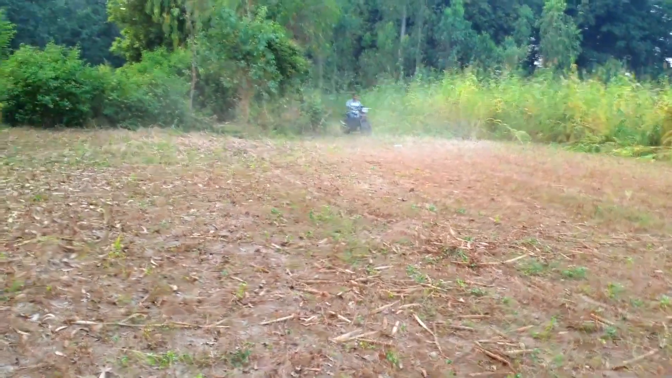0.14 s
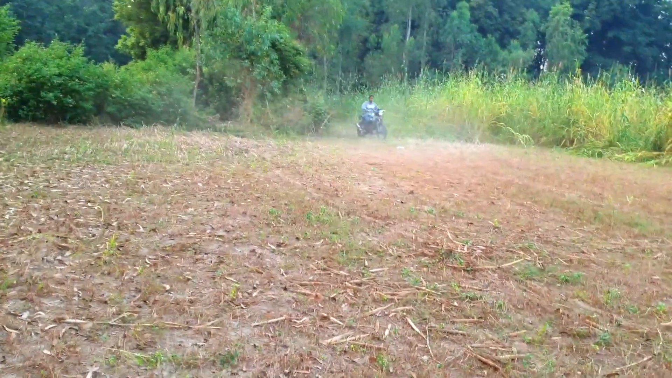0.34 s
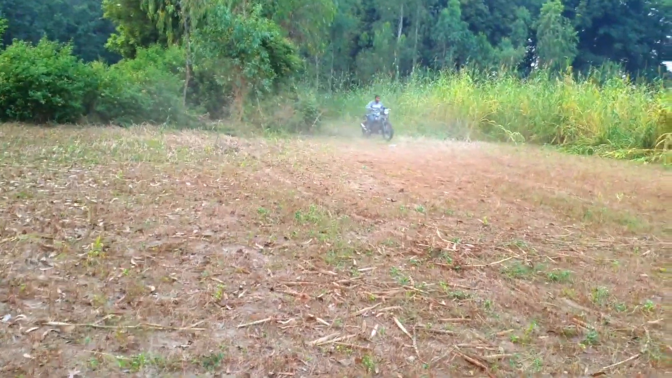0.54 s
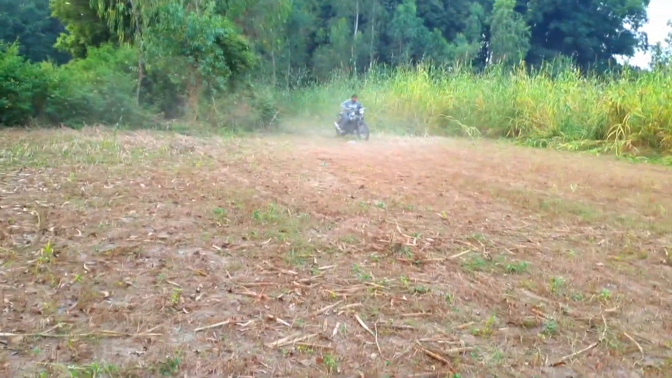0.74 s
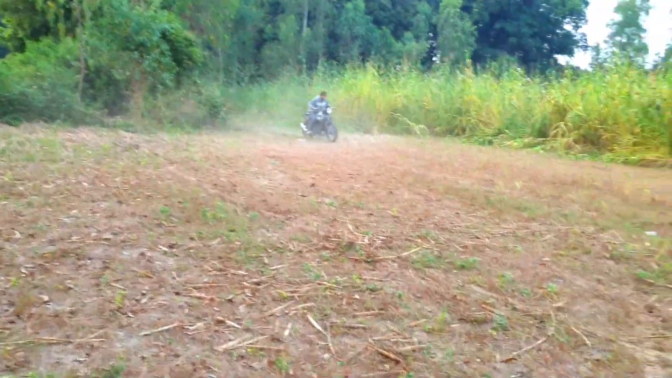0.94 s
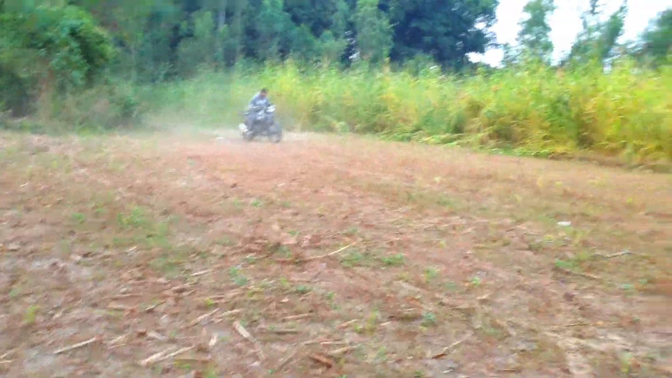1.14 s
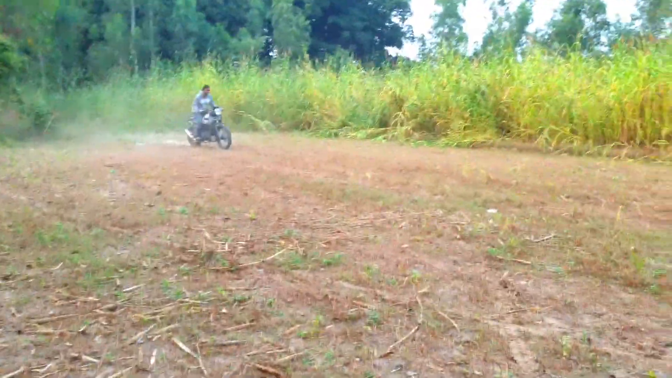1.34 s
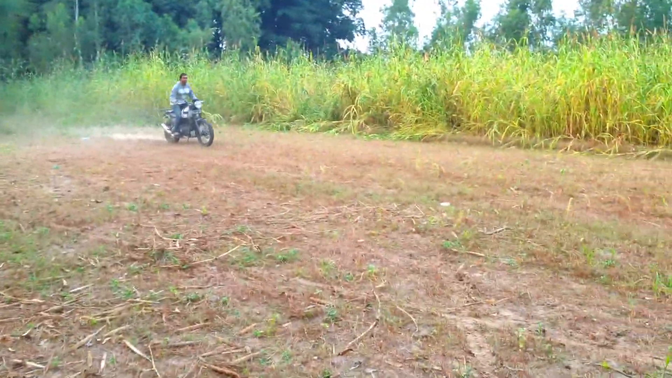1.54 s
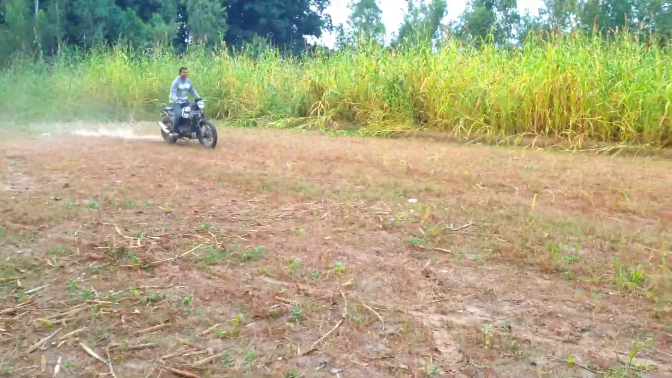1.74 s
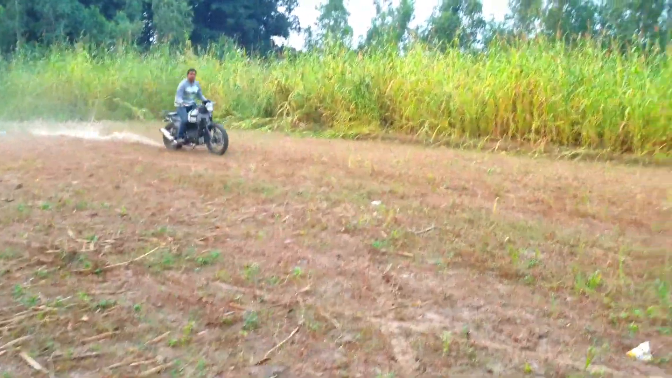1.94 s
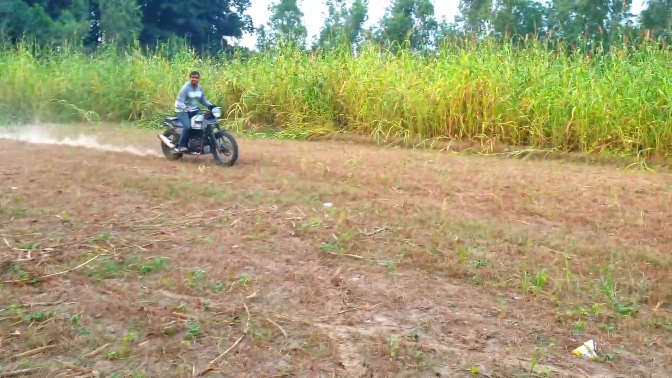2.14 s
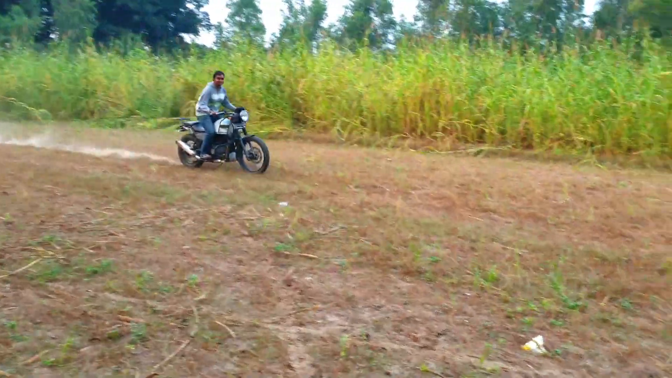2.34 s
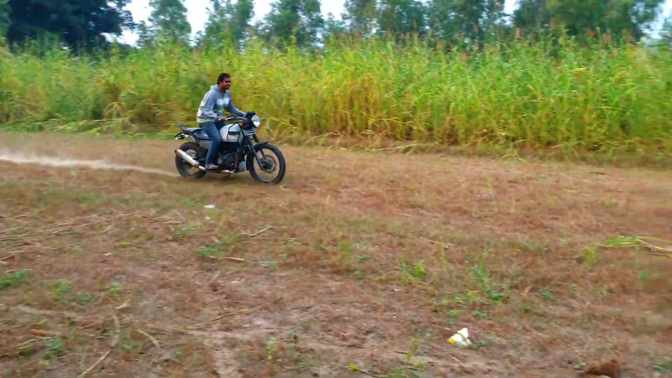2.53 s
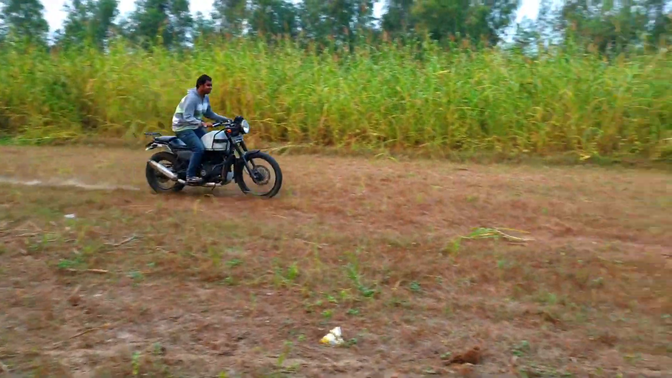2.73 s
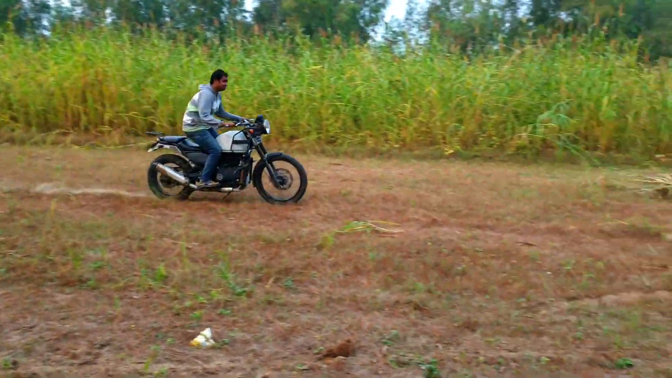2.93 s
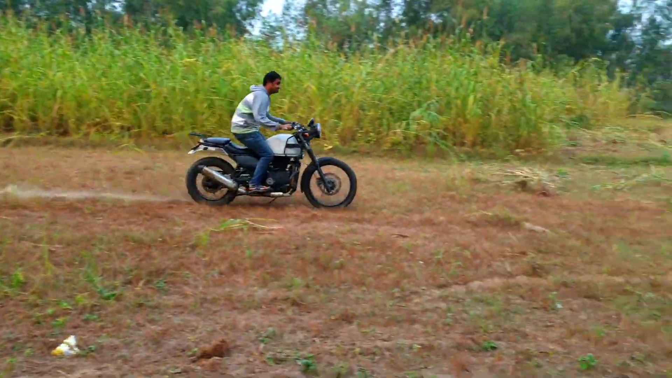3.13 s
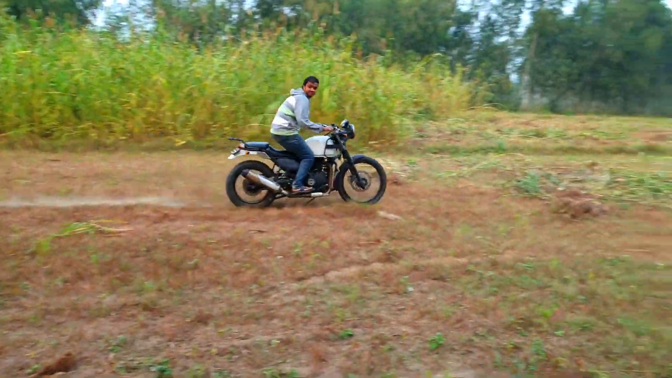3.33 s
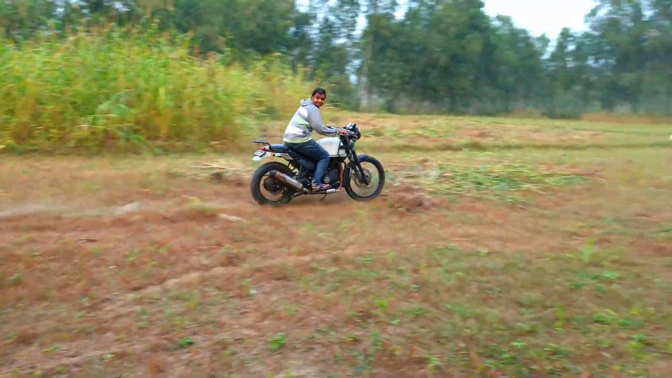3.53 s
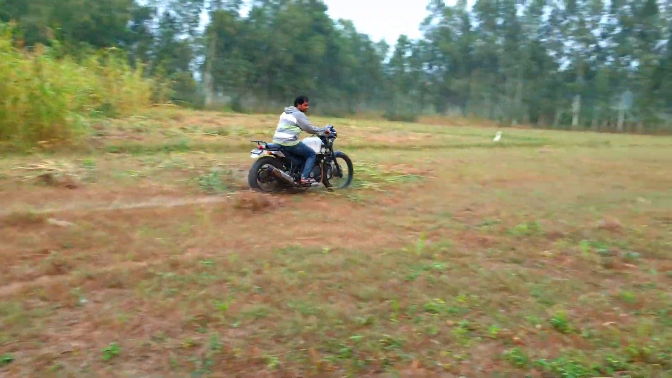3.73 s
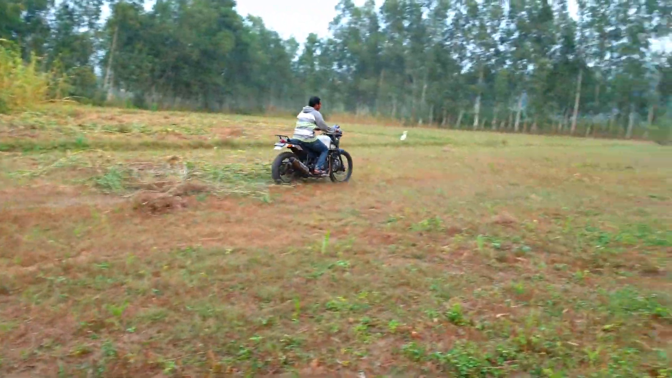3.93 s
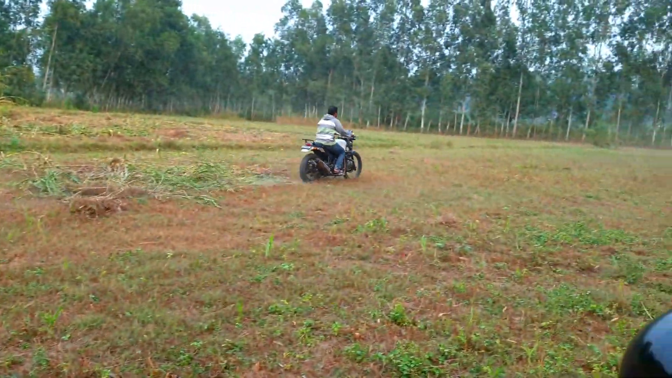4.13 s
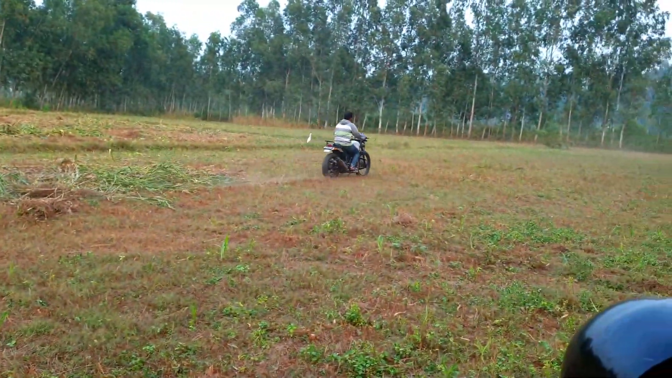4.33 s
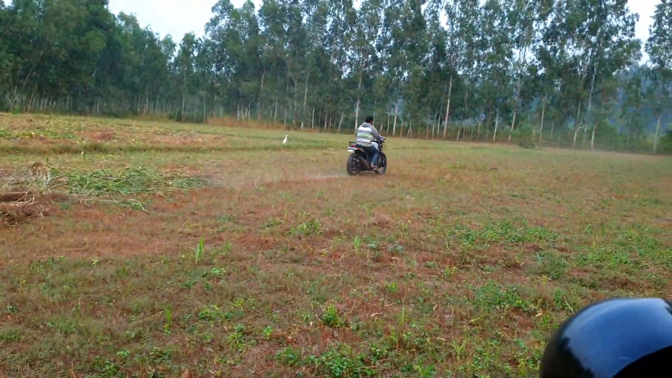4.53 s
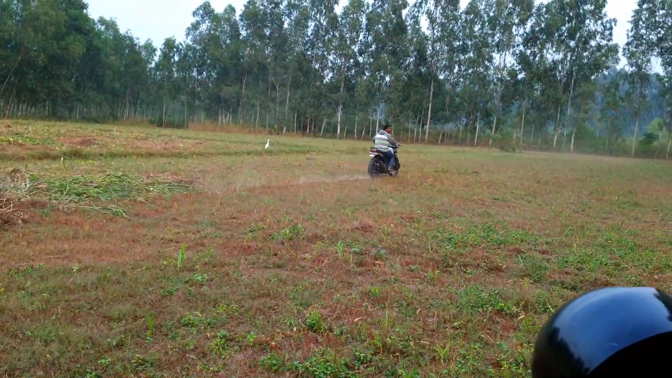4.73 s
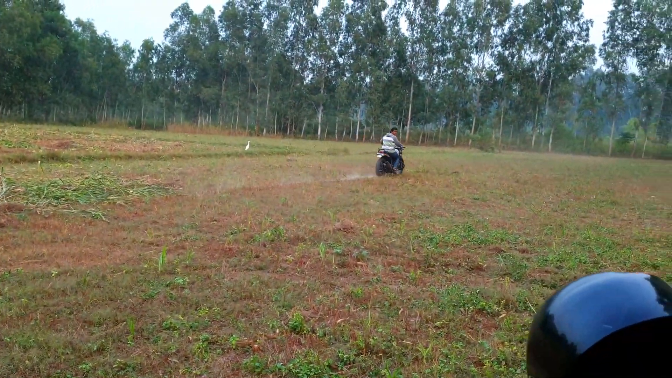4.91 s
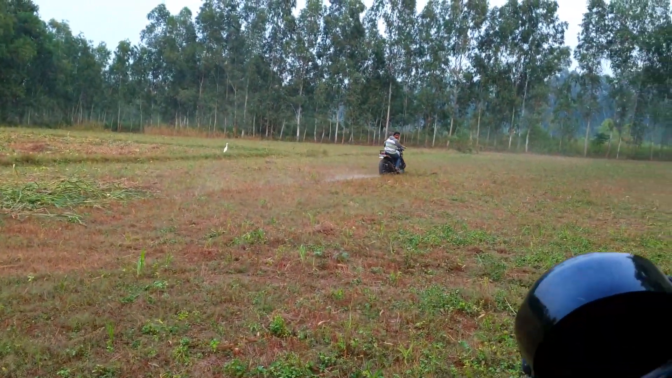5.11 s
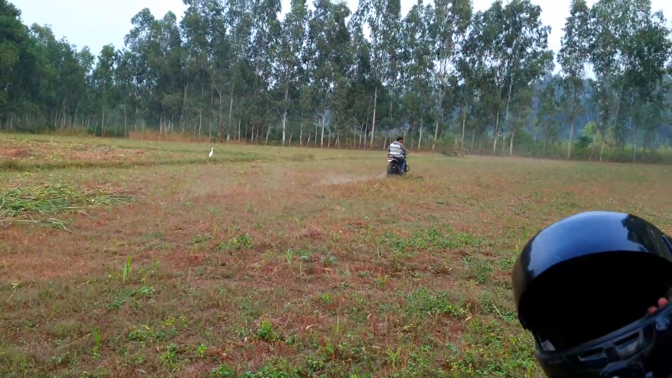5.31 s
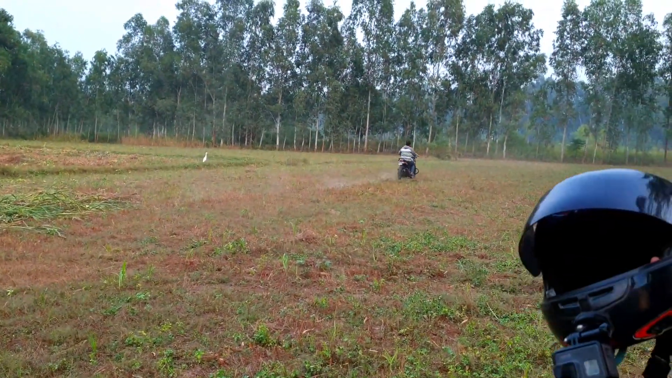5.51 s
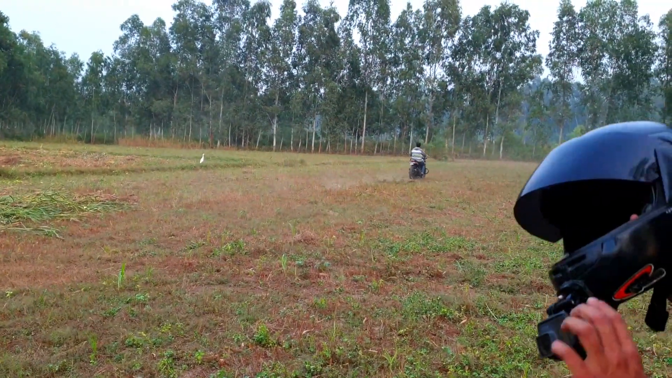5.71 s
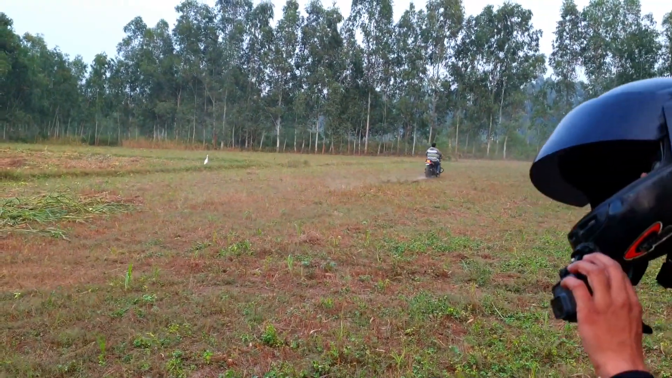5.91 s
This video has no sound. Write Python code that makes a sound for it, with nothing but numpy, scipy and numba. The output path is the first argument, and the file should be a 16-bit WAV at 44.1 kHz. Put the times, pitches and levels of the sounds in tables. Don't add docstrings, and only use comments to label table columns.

```python
import sys
import numpy as np
from scipy import signal
from scipy.fft import rfft, irfft, next_fast_len
from scipy.io import wavfile
from scipy.ndimage import uniform_filter1d, map_coordinates
from numba import njit

SR = 44100
rng = np.random.default_rng(int(sys.argv[2]) if len(sys.argv) > 2 else 0)


def store_pcm(level_fs):
    pcm = np.round(np.clip(level_fs, -1, 1) * 32767).astype(np.int16)
    wavfile.write(sys.argv[1], SR, np.atleast_2d(pcm).T)


def volts_from_db(level):
    exponent = np.asarray(level, float) / 20
    return 10 ** exponent


N = 267141
TIME_S = np.arange(N) / SR
GRID_HZ = np.arange(2049) * SR / 4096
SHUT_S = 3.76
SWITCH_S, SWITCH_FADE_S = 3.145, 0.0036


# (time [s], firing rate [Hz])
RIDE = [(0, 22.7), (.45, 23.2), (.8, 28.2), (1.05, 29.7), (1.33, 39.5), (1.68, 45.2), (2.09, 46.4),
        (2.25, 49.7), (2.48, 52.7), (2.65, 52.8), (3.05, 55.9), (3.3, 57.4), (3.63, 56.4), (3.9, 47.2),
        (4.17, 45), (4.75, 41.9), (5.42, 38.2), (6.06, 33.5)]


def firings():
    hz = curve(RIDE)[0]
    turns = np.cumsum(hz) / SR + 0.005 * walk(15)
    turns += 2 - turns[int((POPS[-1][0] - 0.002) * SR)] % 1
    cycle = np.maximum.accumulate(turns.astype(int))
    clicks = np.diff(cycle, prepend=cycle[0]).astype(float)
    chance = rng.standard_normal((N // 500, 4))[cycle].T
    return hz, turns, clicks, chance


# (frequency [Hz], width [Hz], level [dB])
BOOM = [(55, 15, 1), (118, 177, 3.5)]


def silencer(pulses, turns):
    cooling_hz_per_s = 8.6
    chamber_hz = 131.8 - cooling_hz_per_s * np.maximum(TIME_S - SHUT_S, 0)
    boom = ring(chamber(pulses, chamber_hz, 31.0), BOOM)
    boom = signal.sosfilt(signal.butter(2, 360, fs=SR, output="sos"), boom)
    spin = np.exp(4j * np.pi * turns)
    slow = signal.sosfiltfilt(signal.butter(2, 7, fs=SR, output="sos"), boom / spin)
    crank = 2 * (slow * spin).real
    return even(crank), even(boom - crank, 0.22)


@njit
def chamber(x, hz, width):
    y, band, low = np.empty(len(x)), 0., 0.
    for i in range(len(x)):
        g, k = np.tan(np.pi * hz[i] / SR), width / hz[i]
        v = (band + g * (x[i] - low)) / (1 + g * (g + k))
        band, low, y[i] = 2 * v - band, low + 2 * g * v, k * v
    return y


# (frequency [Hz], density [dB per Hz])
BARK = [
    [(94, -24.5), (160, 8), (204, 7), (226, 4), (254, 4), (319, 3.5), (352, -13.5), (415, -0.5), (507, -32),
     (545, -15.5), (798, -15), (881, -21), (983, -22), (1400, -19), (1820, -78), (3080, -120)],
    [(94, -40), (160, -2.5), (225, 2.5), (285, 2), (342, 1.5), (400, -12), (475, -21.5), (620, -16),
     (800, -20), (1400, -16.5), (1820, -69), (3080, -120)],
    [(94, -26.5), (160, 3), (220, 3.5), (300, 4), (350, -1), (400, -18), (460, -38), (700, -54),
     (1230, -120)],
]


def tailpipe(pulses):
    echo = np.interp(np.arange(N) - 0.00879 * SR, np.arange(N), pulses)
    flutter = 0.007 * volts_from_db(2 * walk(30)) * rng.standard_normal(N)
    return even(facing(pulses + 0.16 * echo + flutter, BARK, curve(ASPECT)[1]), 1.0)


def exhaust(turns, clicks, chance, surge, crank_db, boom_db, bark_db):
    stumble = np.exp(-((TIME_S - SHUT_S) / 0.045) ** 2)
    scatter_db = (0.8 + 3.5 * stumble) * chance
    boost_db = 4 * stumble
    pulses = clicks * volts_from_db(scatter_db)
    crank, boom = silencer(pulses, turns)
    bark = tailpipe(pulses)
    extra_db = sum(db * (abs(TIME_S - s) < 0.006) for s, db, *_ in POPS)
    charge = volts_from_db(fade(extra_db * clicks, 0.0092))
    boom_level = volts_from_db(boom_db + boost_db - 5.5 * surge)
    return volts_from_db(crank_db) * crank + charge * (boom_level * boom + volts_from_db(bark_db + boost_db) * bark)


def load_whine(turns, surge):
    return volts_from_db(-34) * surge * np.sin(12 * np.pi * turns)


def gas_gate(hz, turns, chance, strength):
    depth = np.clip(0.13 * 30 / hz, 0, 1)
    puff = volts_from_db(2.0 * chance) * np.exp(-(turns % 1) / hz / 0.0029)
    return 1 - depth + strength * depth * puff


# (frequency [Hz], density [dB per Hz])
RASP = [
    [(250, -69), (420, -9), (507, -10.5), (781, -8.5), (878, -17.5), (978, -22.5), (1430, -14), (1770, -13),
     (1950, -7), (2260, -9.5), (2700, -6), (3230, -7), (3600, -7.5), (4680, -10.5), (7920, -120)],
    [(250, -54), (420, -26), (526, -13.5), (613, -10), (817, -8.5), (1120, -10), (1400, -2), (1940, -7.5),
     (2160, 1), (2490, -4.5), (2800, -1.5), (3170, -7.5), (3600, -32.5), (4680, -17), (7920, -120)],
    [(250, -6), (420, -9.5), (575, -31), (689, -8), (995, -12), (1250, -8.5), (1560, -4.5), (1720, -8),
     (1870, 3.5), (2030, -4.5), (2280, 5.5), (3200, -8), (3600, -10.5), (4680, -66), (7920, -120)],
]


def gas_rasp(hz, turns, chance):
    return hiss(gas_gate(hz, turns, chance, 3) * volts_from_db(0.94 * walk(25.07)), RASP, 1.3)


# (frequency [Hz], density [dB per Hz])
SIZZLE = [
    [(2060, -16), (3500, -30.5), (4180, 1.5), (4620, -9), (5340, 1), (6220, 3.5), (6750, -2), (8150, -8),
     (9140, -3.5), (11400, -8), (12700, -12), (14200, -15), (15800, -22.5)],
    [(2060, -30), (3500, 0), (3780, -2), (4650, -6.5), (6620, -2), (7900, -7), (9920, -9), (11500, -11),
     (12900, -13.5), (15100, -16.5), (15800, -75.5)],
    [(2060, -54), (3500, -2), (4150, -3), (4490, -5), (5010, -7.5), (5910, 0.5), (6200, -10), (6470, -15),
     (7090, -7), (8010, -22), (9440, -13.5), (10300, -17), (11600, -20), (13800, -22), (15000, -29)],
]


def gas_sizzle(hz, turns, chance):
    return hiss(gas_gate(hz, turns, chance, 8.8) * volts_from_db(1.0 * walk(10)), SIZZLE, 1.0)


# (frequency [Hz], width [Hz], level [dB])
FINS = [(852, 8.7, 7.5), (999, 4.2, 8), (1624, 50, -3.5), (1930, 6.4, 2), (2268, 11, -7), (2792, 5.7, 4.5),
        (3990, 52, -5), (4860, 67, 3.5), (5260, 55, -3), (6300, 20, -9), (6795, 64, 3)]
# (frequency [Hz], direct share [0-1])
DIRECT_SHARE = [(400, 0.69), (1500, 0.83), (3000, 1), (6000, 0.41), (10000, 0), (16000, 0.03)]


def hiss(gate, spectra, fins_db):
    share = np.clip(on_grid(DIRECT_SHARE), 0.02, 0.98)
    aspect = curve(ASPECT)[0]
    fins = 1 + sum(volts_from_db(db + fins_db) / np.sqrt(1 + (2 * (GRID_HZ - hz) / width) ** 2)
                   for hz, width, db in FINS)
    noise = rng.standard_normal((3, N)) * gate
    shares = (share, 1 - share, 1 - share)
    parts = np.array([facing(x, spectra, aspect, fins * np.sqrt(w)) for x, w in zip(noise, shares)])
    return parts / np.sqrt(uniform_filter1d(parts[0] ** 2 + parts[1] ** 2, SR // 5))


def valve_ticks(clicks, chance):
    ticks = burst(np.roll(clicks, 40) * volts_from_db(3.8 * chance), 0.0024, [(9060, 820, 7.6), (10550, 2000, 2.6)])
    return ticks / ticks.std()


def tailpipe_chirp(clicks, chance):
    chirp = burst(np.roll(clicks, -30) * volts_from_db(1.8 * chance), 0.0014, [(2400, 450, 0), (6000, 500, -10)])
    chirp = ring(chirp, [(2400, 600, 0), (6000, 600, 0)])
    return chirp / chirp.std()


# (time [s], extra charge [dB], crack level [dB], frequency [Hz], width [Hz])
POPS = [
    (.169, 0, -27, 7500, 4000),
    (2.79, 0, -3, 800, 600),
    (3.598, 0, -11, 1400, 900),
    (3.617, 1, -10, 2200, 1200),
    (4.175, 0, -17, 700, 400),
    (5.4655, 0, -22, 3500, 800),
    (5.4645, 0, -17, 700, 500),
    (5.465, 7, -16, 1650, 800),
]


def lone_cracks():
    out = np.zeros(N)
    for s, _, db, hz, width in POPS:
        start = int(s * SR)
        snap = volts_from_db(db) * np.exp(-np.arange(900) / SR / 0.0016) * rng.standard_normal(900)
        out[start:start + 900] += ring(ring(snap, [(hz, width, 6)]), [(hz, 2 * width, 0)])
    return out


# (time [s], nearness [dB], throttle [0-1])
EFFORT = [(0, -19, 0.45), (.3, -21.5, 0.47), (.75, -14, 0.67), (.95, -13, 0.62), (1.25, -7.5, 0.76),
          (1.45, -7.5, 0.7), (1.95, -6.5, 0.98), (2.13, -6, 0.88), (2.4, -3, 0.83), (3.05, -0.5, 0.98),
          (3.22, -2, 0.98), (3.6, -1.5, 0.96), (3.78, -8.5, 0.63), (4.2, -13.5, 0.1), (5.1, -20, 0),
          (5.6, -25, 0.12), (6.06, -27.5, 0.72)]
# (nearest and coasting [dB], share of nearness [dB/dB], at full throttle [dB],
# per turn away [dB], once the ports change [dB])
LAYERS = [
    (-33.5, 0.68, 16.5, 4.2, -4.5),
    (-26, 0.51, 5.5, 5, -3.5),
    (-25, 0.97, 5.5, 0.95, 2),
    (-21, 1.05, 0, 0, 0),
    (-21, 1.066, 1.6, 0.87, -2),
    (-42.5, 0.43, 6.5, -19, -1),
    (-37.5, 0.57, -5.4, 1, 3.5),
    (-52, 0.27, 13, -1, -3),
]


def levels():
    near_db, throttle = curve(EFFORT)
    away = np.maximum(curve(ASPECT)[0] - 1, 0)
    late = TIME_S > SWITCH_S
    return [db + share * near_db + open_db * throttle + away_db * away + late_db * late
            for db, share, open_db, away_db, late_db in LAYERS]


# (time [s], body turned [0-3],
# tailpipe turned [0-2], left port lag [samples])
ASPECT = [(0, 0.056, 0, 1.5), (.6, 0.15, .02, 1.8), (1.3, 0.12, 0, -5), (2.0, 0.12, 0.0026, -5),
          (2.6, 0.89, 0.91, -3.5), (3.0, 0.95, 0.55, -3.5), (3.2, 0.91, 0.875, -3.5),
          (3.62, 0.84, 1.2, -3.5), (3.9, 1, 1.7, -2.5), (4.3, 1.44, 1.72, -0.7), (4.6, 1.8, 1.67, 1.5),
          (5.4, 3, 1.85, 1.5), (6.06, 2.8, 1.68, 3.5)]


def at_ports(direct):
    lag = curve(ASPECT)[2]
    return np.array([map_coordinates(direct, [np.arange(N) - side * lag / 2], order=3, mode="nearest")
                     for side in (1, -1)])


def port_wind():
    wind = ring(ring(rng.standard_normal((2, N)), [(44.6, 52, 0)]), [(44.4, 58, 0)])
    wind = wind * volts_from_db(walk(5.8))
    return wind / wind.std()


# (frequency [Hz], density [dB per Hz])
FIELD = [(30, -23), (100, -8), (500, -10.5), (2000, -9), (7000, -12), (9000, -19), (13000, -25),
         (15000, -38), (16000, -45)]


def field_murmur():
    field = np.array([colour(x, volts_from_db(on_grid(FIELD))) for x in rng.standard_normal((2, N))])
    return field / field.std() * volts_from_db(-48)


def facing(x, spectra, aspect, shape=1):
    gains = [volts_from_db(on_grid(s)) * shape for s in spectra]
    return sum(np.sqrt(np.clip(1 - abs(aspect - k), 0, 1)) * colour(x, g) for k, g in enumerate(gains))


def curve(rows):
    s, *columns = np.transpose(rows)
    return [np.interp(TIME_S, s, c) for c in columns]


def on_grid(rows):
    hz, value = np.transpose(rows)
    return np.interp(np.log(GRID_HZ + 1), np.log(hz), value)


def colour(x, gain):
    cep = irfft(np.log(gain + 1e-6))
    cep[1:2048] *= 2
    cep[2049:] = 0
    return signal.oaconvolve(x, irfft(np.exp(rfft(cep)))[:2048])[:N]


def ring(x, modes):
    return sum(volts_from_db(db) * signal.lfilter(*signal.iirpeak(hz, hz / width, fs=SR), x) for hz, width, db in modes)


def burst(clicks, decay_s, modes):
    return ring(fade(clicks, decay_s) * rng.standard_normal(N), modes)


def fade(x, decay_s):
    return signal.lfilter([1], [1, -np.exp(-1 / SR / decay_s)], x)


def even(x, span_s=0.23):
    k = int(span_s * SR)
    return x / np.sqrt(uniform_filter1d(uniform_filter1d(x ** 2, k), k) + 1e-12)


def walk(rate):
    k = int(SR / rate)
    return 1.2 * uniform_filter1d(np.repeat(rng.standard_normal(N // k + 1), k), k)[:N]


def scene():
    crank_db, boom_db, bark_db, rasp_db, sizzle_db, tick_db, chirp_db, wind_db = levels()
    hz, turns, clicks, chance = firings()
    surge = np.exp(-((TIME_S - 0.99) / 0.21) ** 2)
    rasp = gas_rasp(hz, turns, chance[1]) * volts_from_db(rasp_db)
    sizzle = gas_sizzle(hz, turns, chance[1]) * volts_from_db(sizzle_db)
    direct = exhaust(turns, clicks, chance[0], surge, crank_db, boom_db, bark_db)
    direct += load_whine(turns, surge)
    direct += rasp[0] + sizzle[0]
    direct += valve_ticks(clicks, chance[2]) * volts_from_db(tick_db)
    direct += tailpipe_chirp(clicks, chance[3]) * volts_from_db(chirp_db)
    direct += lone_cracks()
    scattered = rasp[1:] + sizzle[1:]
    return at_ports(direct) + scattered + port_wind() * volts_from_db(wind_db) + field_murmur()


# (frequency [Hz], left minus right [dB])
PORTS_EARLY = [(60, -16), (200, -18), (380, -5.5), (700, -2.5), (1300, 1.5), (2400, 5.5), (4000, 2.5),
               (6500, 15.5), (8000, 1.5), (10000, -4), (15000, -8.5)]
# (frequency [Hz], left minus right [dB])
PORTS_LATE = [(60, .6), (500, .8), (1300, 4), (2400, 4), (4400, 3.5), (6500, 4.5), (9000, .3),
              (15000, -2.5)]
# (frequency [Hz], left lead [radians])
LEAD = [(100, 0.034), (400, 0.27), (1000, 0.7), (2000, 0.86), (3000, 0.017)]


def phone_ports(dry):
    late = np.clip((TIME_S - SWITCH_S) / SWITCH_FADE_S + 0.5, 0, 1)
    size, out = next_fast_len(N), 0
    hz = np.arange(size // 2 + 1) * SR / size
    lead = np.exp(1j * np.interp(hz, GRID_HZ, on_grid(LEAD)))
    spectrum = rfft(dry, size)
    for balance, on in ((PORTS_EARLY, 1 - late), (PORTS_LATE, late)):
        ratio = np.interp(hz, GRID_HZ, volts_from_db(on_grid(balance)))
        gains = 2 * np.array([ratio * lead, np.ones_like(ratio)]) / (1 + ratio)
        out = out + on * irfft(spectrum * gains, size)[:, :N]
    return out


def low_pass(x):
    return signal.sosfilt(signal.butter(12, 15970, fs=SR, output="sos"), x)


def record(dry):
    soft = np.tanh(0.64 * phone_ports(dry)) / 0.56
    mix = signal.sosfilt(signal.butter(2, 34, "high", fs=SR, output="sos"), soft)
    return low_pass(mix)


dry = scene()
out = record(dry)
store_pcm(out)
```